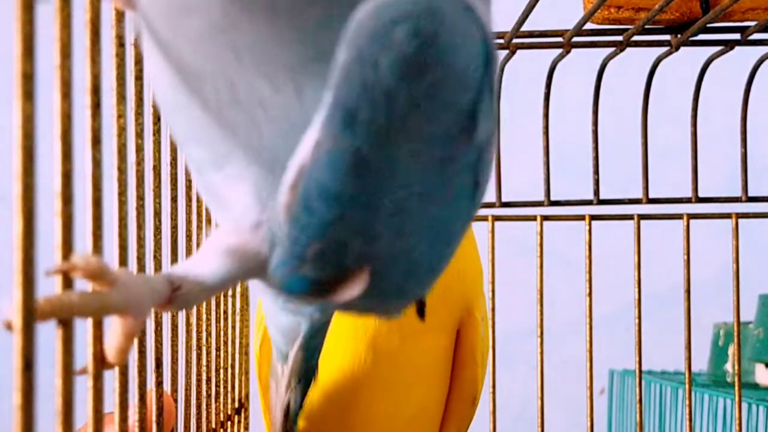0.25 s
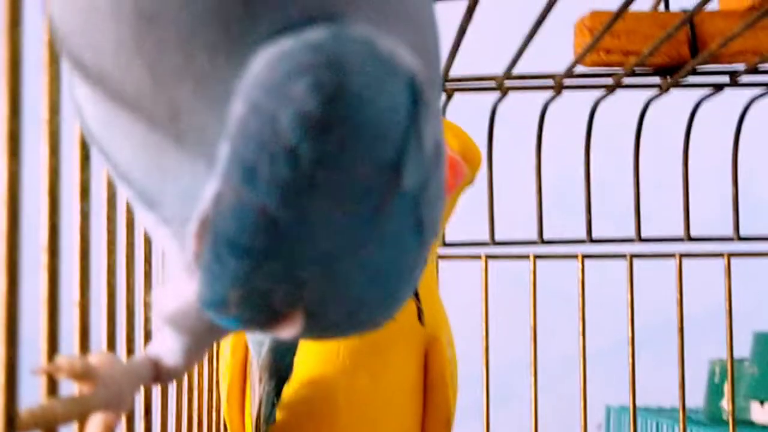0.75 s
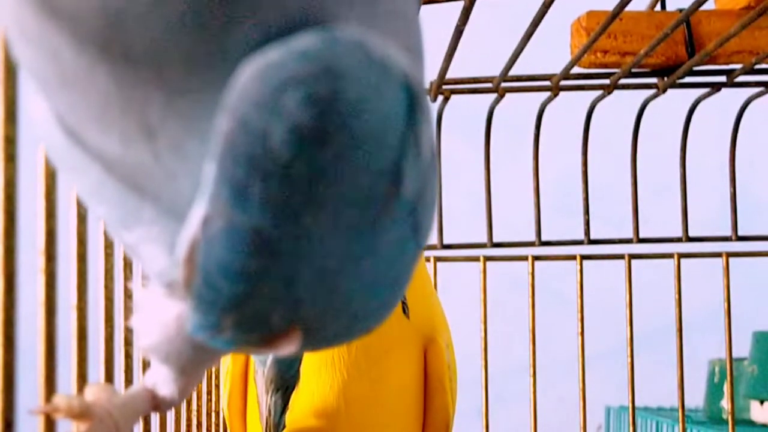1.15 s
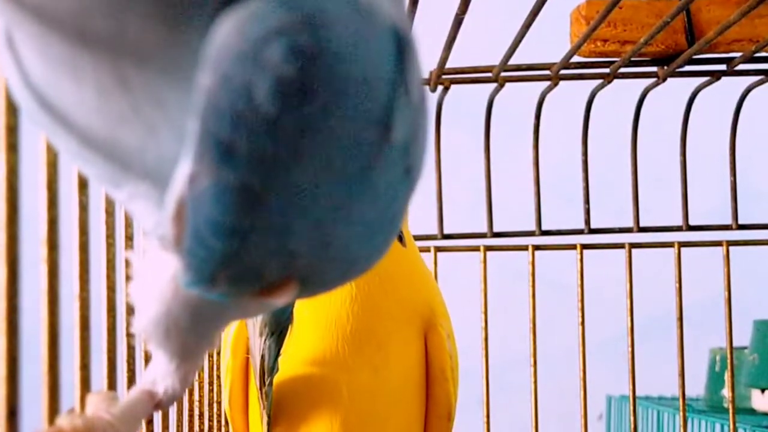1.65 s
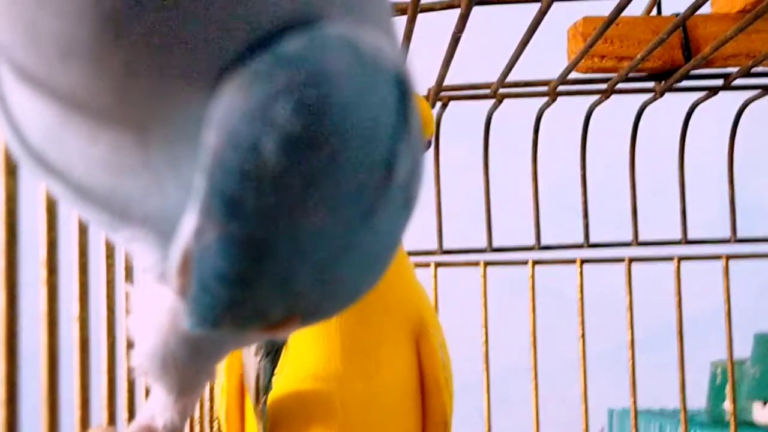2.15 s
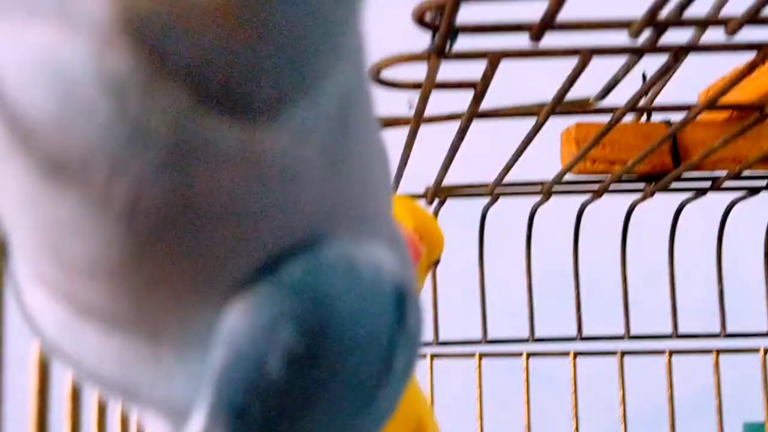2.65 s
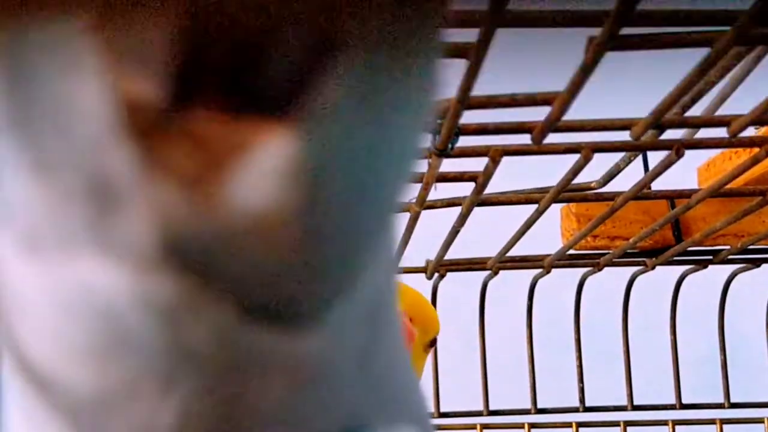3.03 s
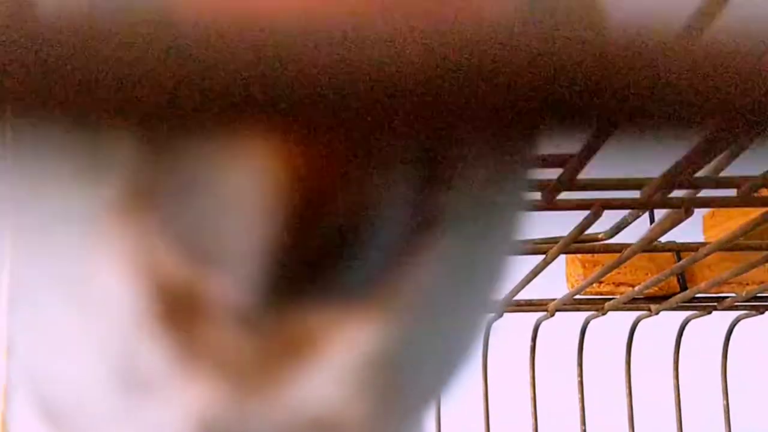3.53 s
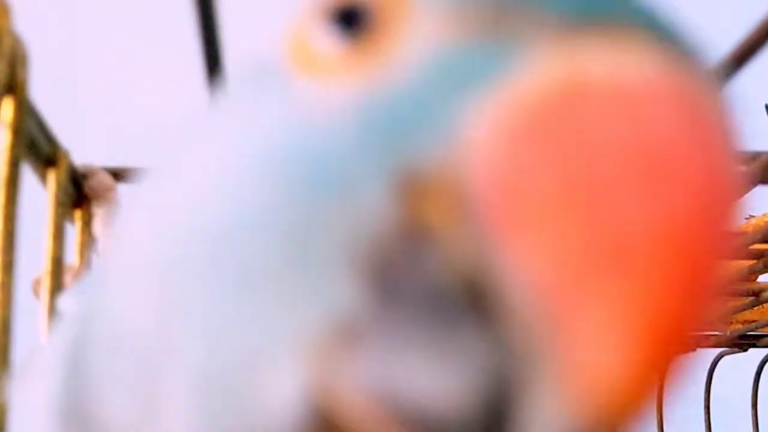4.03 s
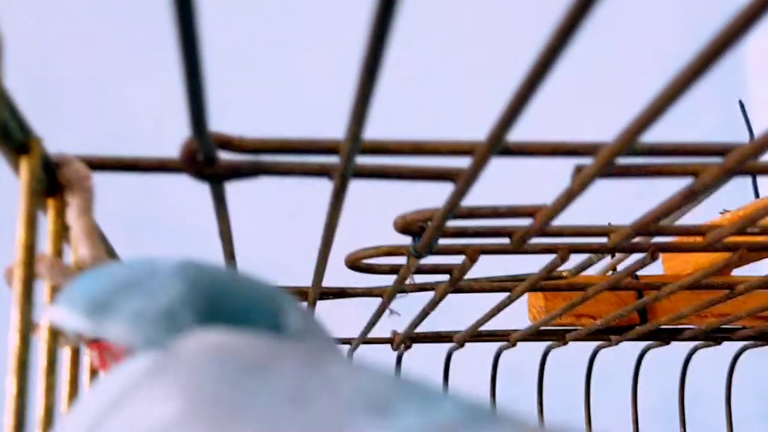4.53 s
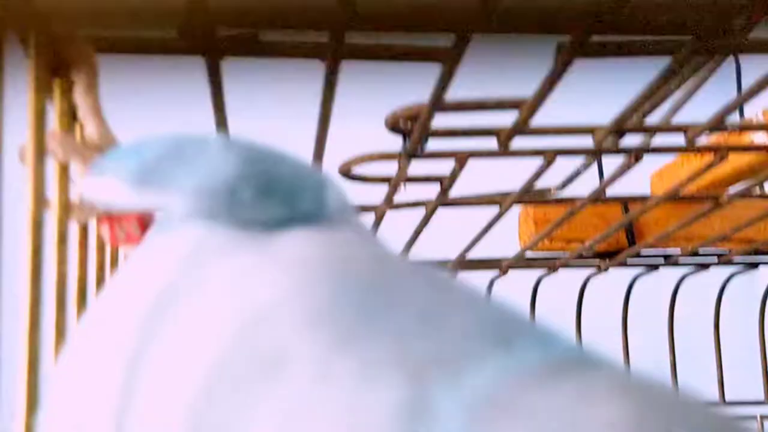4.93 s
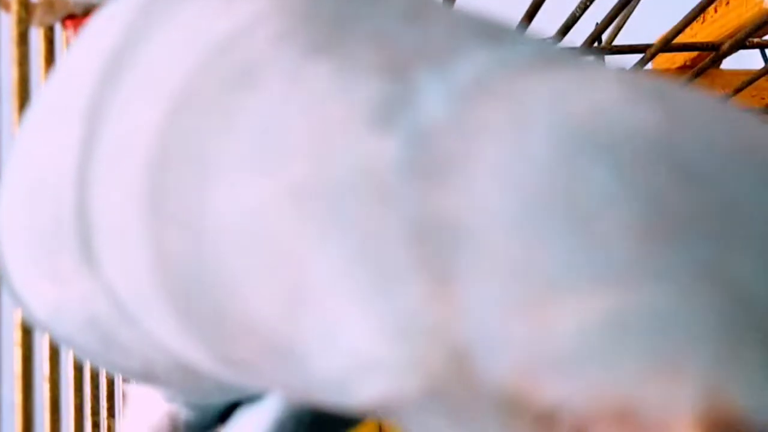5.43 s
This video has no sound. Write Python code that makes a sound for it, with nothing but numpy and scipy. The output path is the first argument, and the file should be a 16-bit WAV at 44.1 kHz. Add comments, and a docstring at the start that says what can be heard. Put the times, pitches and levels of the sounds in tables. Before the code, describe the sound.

Parakeets give three loud, harsh squawks close to the microphone, with light claw ticks and feather rustles on a wire cage indoors.

```python
"""Two parakeets squawking in a wire cage

Three harsh squawks sound right at the microphone, in a hard-walled room. Each bursts out as a screech,
locks into a high whistle, then breaks into a lower, falling rasp that overloads the microphone.
Claws tick on the wires, feathers rustle, the cage hums as the birds climb, and far-off birds call."""
import sys
import numpy as np
from scipy import signal
from scipy.fft import rfft, irfft, next_fast_len
from scipy.io import wavfile
from scipy.ndimage import uniform_filter1d, minimum_filter1d, map_coordinates

SR = 44100
rng = np.random.default_rng(int(sys.argv[2]) if len(sys.argv) > 2 else 0)


def persist_wave(psi):
    """Save psi, clipped to +-1, as 16-bit WAV."""
    counts = np.round(np.clip(psi, -1, 1) * 32767).astype(np.int16)
    wavfile.write(sys.argv[1], SR, np.atleast_2d(counts).T)


N = 250488
TOP_HZ = 15830  # upper edge of the treble

# How the throat and open beak shape the voice: (frequency [Hz], level [dB])
THROAT = [(1000, -23), (1600, -19), (2200, -10.5), (3200, -9), (4300, -6), (5200, -12), (6400, -19),
          (7400, -15), (8500, -9.5), (10500, -22.5), (13000, -20.5), (15500, -20)]


def amp(db):
    """Turn decibels into a factor to multiply by."""
    return 10 ** (np.asarray(db) / 20)


def along(points, hz):
    """Read between (frequency, value) points, with octaves evenly spaced."""
    freqs, values = np.transpose(points)
    return np.interp(np.log(hz + 1), np.log(freqs + 1), values)


def wobble(rate, size):
    """A smooth curve through `rate` random values a second."""
    knots = np.random.default_rng(rng.integers(2 ** 31)).standard_normal(int(size * rate / SR) + 4)
    return map_coordinates(knots, [np.arange(size) * rate / SR])


def noise(colour):
    """Noise of average power 1, shaped by (frequency, level) points."""
    size = next_fast_len(N + 8192)
    gains = amp(along(colour, np.fft.rfftfreq(size, 1 / SR)))
    shaped = irfft(rfft(rng.standard_normal(size)) * gains, size)[:N]
    return shaped / np.sqrt(np.mean(shaped ** 2) + 1e-20)


def add(track, start, sound):
    """Mix a sound into the track at `start` seconds."""
    part = track[max(round(start * SR), 0):][:len(sound)]
    part += sound[:len(part)]


def envelope(length, attack, release):
    """Time within a note, and its gain: a smooth rise, a hold, a smooth fall."""
    t = np.arange(int(length * SR)) / SR
    ramps = np.clip([t / attack, (length - t) / release], 0, 1)
    return t, np.prod(np.sin(np.pi / 2 * ramps) ** 2, axis=0)


def outdoor_murmur():
    """Low noise from outside drifts a little in loudness."""
    # Tone of the murmur: (frequency [Hz], level [dB])
    colour = [(15, -34), (28, -2.5), (50, 1.5), (62, -3), (80, 0), (107, -11), (157, -4), (241, -14),
              (473, -19.5), (513, -16.5), (749, -13.5), (834, -16.5), (1870, -16.5), (3390, -33),
              (4210, -33), (5230, -36.5), (11000, -42), (15800, -37.5)]
    # Its slow drift: (time [s], level [dB])
    drift = [(0, -42), (1.499, -42.5), (2.899, -45.5), (4.4, -42), (5.68, -44.5)]
    return amp(np.interp(np.arange(N) / SR, *np.transpose(drift))) * noise(colour)


def far_calls():
    """Distant birds give faint, wavering calls that lose their treble on the way."""
    # Drawn-out calls: (start [s], length [s], first pitch [Hz], last pitch [Hz], level [dB])
    calls = [(0, 0.41, 704, 766, -51), (1.162, 0.39, 862, 879, -42), (1.719, 0.36, 773, 781, -47.5),
             (2.058, 0.24, 784, 752, -41.5), (3.169, 0.2, 1925, 1935, -46.5)]
    # What the distance leaves of them: (frequency [Hz], level [dB])
    colour = [(800, -1), (1600, -4), (2350, -7.5), (3000, -26), (4500, -42.5)]
    out = np.zeros(N)
    for start, length, first_hz, last_hz, db in calls:
        size = int(length * SR)
        hz = np.linspace(first_hz, last_hz, size) * (1 + 0.0021 * wobble(58, size))
        phase = 2 * np.pi * np.cumsum(hz) / SR
        tone = sum(amp(along(colour, k * hz)) * np.sin(k * phase) for k in range(1, 4))
        waver_db = 3 * wobble(32, size)
        add(out, start, amp(db + waver_db) * np.sqrt(np.hanning(size)) * tone)
    return out


def drone(hz, length):
    """One low, unsteady vibration that swells and fades."""
    size = int(length * SR)
    phase = 2 * np.pi * np.cumsum(hz * (1 + 0.1164 * wobble(58.4, size))) / SR
    return np.sqrt(2) * np.hanning(size) * np.sin(phase) * (1 + 0.14 * wobble(49.5, size))


def cage_hums():
    """The frame hums as the birds shift their weight, and one bird jolts the perch."""
    # The frame's two natural notes: (low [Hz], high [Hz])
    frame_hz = (71, 146.5)
    # Shifts of weight: (middle time [s], low note [dB], high note [dB])
    shifts = [(1.732, -49.5, -39.5), (2.57, -38.5, -43), (3.332, -41, -61), (3.818, -40.5, -36.5),
              (4.581, -41.5, -38)]
    # The perch's natural notes: (pitch [Hz], level [dB])
    perch = [(162, -41.5), (225, -42), (305, -46.5)]
    hum_length_s, jolt_middle_s, jolt_length_s = .3, .44, .34
    out = np.zeros(N)
    for middle, *levels in shifts:
        for hz, db in zip(frame_hz, levels):
            add(out, middle - hum_length_s / 2, amp(db) * drone(hz, hum_length_s))
    for hz, db in perch:
        add(out, jolt_middle_s - jolt_length_s / 2, amp(db) * drone(hz, jolt_length_s))
    return out


def feather_rustles():
    """Feathers brush the cage: a quick rise and a slow, grainy fade."""
    # Feather strokes: (start [s], time to fade by 20 dB [s], level [dB])
    strokes = [(0.378, 0.12, -33.5), (2.26, 0.27, -40.5), (3.028, 0.26, -47), (5.17, 0.51, -42.5),
               (5.39, 0.074, -43), (5.56, 1, -44.5)]
    # Tone of the feathers: (frequency [Hz], level [dB])
    colour = [(100, 8), (300, -8.5), (600, -2), (1500, -2), (2200, -8), (4000, -25.5), (12000, -25.5)]
    gain, t = np.zeros(N), np.arange(SR) / SR
    for start, fade_s, db in strokes:
        add(gain, start, amp(db - 20 * t / fade_s) * (1 - np.exp(-t / .013)))
    return gain * amp(2.5 * wobble(120, N)) * noise(colour)


def wire_ticks():
    """Each touch of a claw or beak scrapes briefly and rings the thin wires a little differently."""
    # Touches on the wires: (time [s], level [dB], extra level for the ring [dB])
    touches = [(0.2668, -37.5, -4), (0.3391, -33.5, -1), (0.4594, -37, 8.5), (0.5053, -38, 5),
               (2.2388, -35.5, -11.5), (2.2694, -27.5, -14), (2.3072, -32, 3.5), (2.4644, -33.5, -1.5),
               (2.5344, -31, -1.5), (2.7694, -42.5, -3), (4.799, -43.5, -1.5), (4.9013, -40, 0.5),
               (5.0664, -39, -0.5), (5.4131, -29.5, -4), (5.5564, -35.5, -0.5)]
    # The wires' natural notes: (pitch [Hz], level [dB], time to fade by 60 dB [s])
    wire_notes = [(4200, -15.5, 1), (7740, -5, .25), (8170, -4.5, 0.58), (10200, -8.5, .4),
                  (12400, -14, 0.67), (12800, -5, .3), (15150, 2, .2), (15550, 3, .25)]
    # Tone of the scrape: (frequency [Hz], level [dB])
    scrape_colour = [(1000, -5.5), (3000, -6.5), (6000, -7.5), (8300, -4.5), (10500, -6), (15500, -4.5)]
    spread_db, detune, scrape_fade_s = 3, 0.0087, .1
    rings, scrapes = np.zeros((2, N))
    t = np.arange(SR // 2) / SR
    for start, db, ring_db in touches:
        chances = rng.standard_normal((len(wire_notes), 2))
        for (hz, note_db, fade_s), (level_chance, pitch_chance) in zip(wire_notes, chances):
            gain = amp(note_db + spread_db * level_chance - 60 * t / fade_s)
            phase = 2 * np.pi * hz * (1 + detune * pitch_chance) * t
            buzz = 1.3 * wobble(330, len(t))
            add(rings, start, amp(db + ring_db - 16.5) * gain * np.sin(phase + buzz))
        add(scrapes, start, amp(db - 11 - 60 * t / scrape_fade_s))
    return rings + scrapes * noise(scrape_colour)


def voice(hz, rough, tilt_db, shimmer, beak_hz, beak_db):
    """A membrane vibrates through the throat and beak; roughness shakes its pitch and strength."""
    beak_width_octaves, grit_db = 0.1237, 7.5
    rough, size = np.clip(rough, 0, 1), len(hz)
    shake = .058 * wobble(1300, size) + .03 * wobble(260, size)
    phase = 2 * np.pi * np.cumsum(hz * (1 + rough * shake)) / SR
    tone = np.zeros(size)
    for k in range(1, 10):  # harmonics: whole multiples of the pitch
        beak_boost_db = beak_db * np.exp(-(np.log2(k * hz / beak_hz) / beak_width_octaves) ** 2)
        db = along(THROAT, k * hz) + beak_boost_db + tilt_db * np.log2(k)
        tone += amp(db) * (k * hz < TOP_HZ + 1000) * np.sin(k * phase)
    grit = amp(grit_db * rough * wobble(220, size))
    flicker = 1 + shimmer * rough * wobble(1500, size)
    return np.sqrt(2) * grit * flicker * tone


def screeches():
    """Each squawk bursts out as fluttering noise that fades as the whistle takes over."""
    # Chaotic start of each squawk: (start [s], rise time [s], level [dB], fade speed [dB/s])
    bursts = [(0.843, 0.024, -7.5, 359), (3.394, 0.023, -5, 522), (4.145, .036, -9.5, 149)]
    # Tone of the screech: (frequency [Hz], level [dB])
    colour = [(290, -62), (500, -29), (1000, -15), (1350, -21), (1480, -12), (1860, -8.5), (2450, -5.5),
              (2830, -5), (3220, -8.5), (7040, -19.5), (8250, -12), (12200, -29), (15800, -25)]
    gain, t = np.zeros(N), np.arange(SR // 4) / SR
    for start, attack, db, fade_db_per_s in bursts:
        rise = np.minimum(t / attack, 1) ** 2
        add(gain, start, rise * amp(db - fade_db_per_s * np.maximum(t - attack, 0)))
    return gain * amp(2.5 * wobble(300, N)) * noise(colour)


def whistles():
    """The high voice holds its pitch, with the beak tuned to it, then slides and roughens."""
    # High notes: (start [s], length [s], held pitch [Hz], last pitch [Hz], level [dB], roughness [0-1])
    notes = [(0.883, 0.076, 3497, 3557, 0.5, 0.28), (3.414, .16, 3215, 2788, 7, 0.15),
             (4.174, .175, 3135, 2937, 4, 0.19)]
    out = np.zeros(N)
    for start, length, held_hz, last_hz, db, held_rough in notes:
        t, gain = envelope(length, attack=0.035, release=0.011)
        slide = np.interp(t / length, [.39, 1], [0, 1])  # begins 39% of the way through
        hz = held_hz + (last_hz - held_hz) * slide
        rough = held_rough + 0.415 * slide
        tone = voice(hz, rough, tilt_db=-4, shimmer=.3, beak_hz=held_hz, beak_db=3.4)
        add(out, start, amp(db) * gain * tone)
    return out


def rasps():
    """The low voice slides down and frays; the rougher it gets, the more air hisses in the throat."""
    # Low notes: (start [s], length [s], first pitch [Hz], last pitch [Hz], level [dB],
    # average roughness [0-1], frequency the beak boosts [Hz])
    notes = [(0.87, 0.041, 2535, 2446, -6, 0.54, 2600), (0.91, 0.11, 2410, 2156, 1.5, .48, 4120),
             (0.995, 0.1, 2138, 1836, -2.5, .6, 3970), (3.537, 0.11, 2141, 1643, 6, .52, 3010),
             (4.305, .092, 2179, 1641, 2, 0.6, 2975)]
    voices, air = np.zeros((2, N))
    for start, length, first_hz, last_hz, db, mean_rough, beak_hz in notes:
        t, gain = envelope(length, attack=0.31 * length, release=0.27 * length)
        hz = np.interp(t / length, [.16, .72], [first_hz, last_hz])
        rough = mean_rough + 0.38 * (t / length - .5)
        tone = voice(hz, rough, tilt_db=-0.9, shimmer=0.39, beak_hz=beak_hz, beak_db=6)
        add(voices, start, amp(db) * gain * tone)
        add(air, start, amp(db) * gain * rough)
    flutter = amp(2.5 * wobble(300, N))
    return voices + amp(-10.5) * air * flutter * noise(THROAT)


def room_echo(sound):
    """Hard walls answer after 5 ms; the middle pitches linger longest."""
    # How long the room rings: (frequency [Hz], time to fade by 60 dB [s])
    fade_times = [(300, 0.073), (2000, 0.63), (4000, 0.5), (8000, 0.4), (15000, 0.26)]
    out = np.zeros(N)
    for part in np.array_split(np.arange(N), 7):  # new echoes for each stretch, as the birds move
        hz, t, spectrum = signal.stft(rng.standard_normal(SR), SR, nperseg=256)
        fade = amp(-60 * t / along(fade_times, hz)[:, None])
        tail = signal.istft(spectrum * fade, SR, nperseg=256)[1]
        add(out, part[0] / SR + .005, signal.fftconvolve(sound[part], tail / np.linalg.norm(tail)))
    return out


def scene():
    """Birds and cage in the room, over the sounds from outside; both channels are the same."""
    birds = amp(-5.5) * (screeches() + whistles() + rasps())
    cage = wire_ticks() + feather_rustles()
    echo = room_echo(birds + amp(3) * cage)
    mono = birds + amp(2) * cage + echo + cage_hums() + far_calls() + outdoor_murmur()
    return np.array([mono, mono])


def overload(sound, upper, lower):
    """The microphone flattens the loudest peaks, more on one side, which adds a low rumble and fizz."""
    limit = np.where(sound > 0, upper, lower)
    bent = sound / (1 + np.abs(sound / limit) ** 4) ** (1 / 4)
    return signal.sosfilt(signal.butter(1, 12, "highpass", fs=SR, output="sos"), bent)


def gain_control(sound, ceiling_db, release_db_per_s):
    """The volume drops at once when a peak passes the ceiling, then creeps back up."""
    peak_db = 20 * np.log10(-minimum_filter1d(-np.abs(sound[0]), size=200) + 1e-9)
    excess_db = np.maximum(peak_db - ceiling_db, 0)
    recovery = release_db_per_s * np.arange(N) / SR
    cut_db = np.maximum.accumulate(excess_db + recovery) - recovery
    return sound * amp(-uniform_filter1d(cut_db, size=200))


def record(dry):
    """Loud squawks overload the microphone and are turned down and rounded; the top treble is cut."""
    bent = overload(dry, upper=2.02, lower=4)
    held = gain_control(bent, ceiling_db=-2.5, release_db_per_s=68)
    rounded = held / (1 + np.abs(held / .92) ** 6) ** (1 / 6)
    size = next_fast_len(N + SR // 2)
    treble_cut = np.clip((TOP_HZ - np.fft.rfftfreq(size, 1 / SR)) / 200 + .5, 0, 1)
    return irfft(rfft(rounded, size) * treble_cut, size)[:, :N]


dry = scene()
out = record(dry)
persist_wave(out)
```